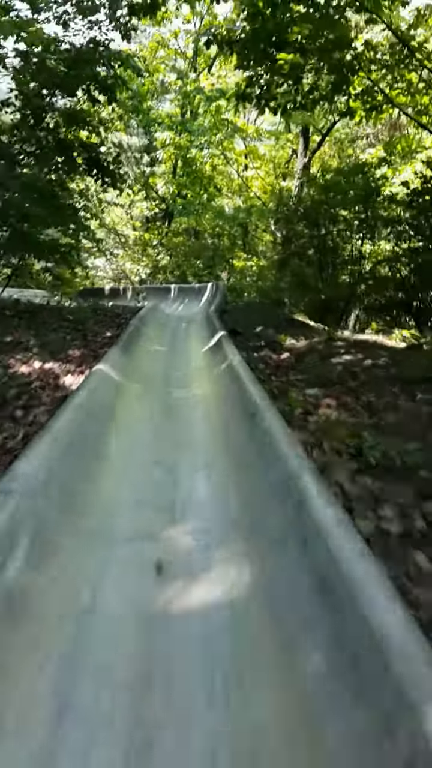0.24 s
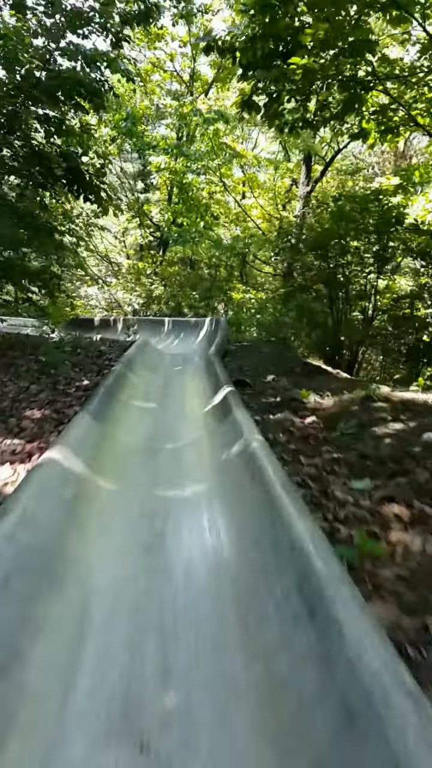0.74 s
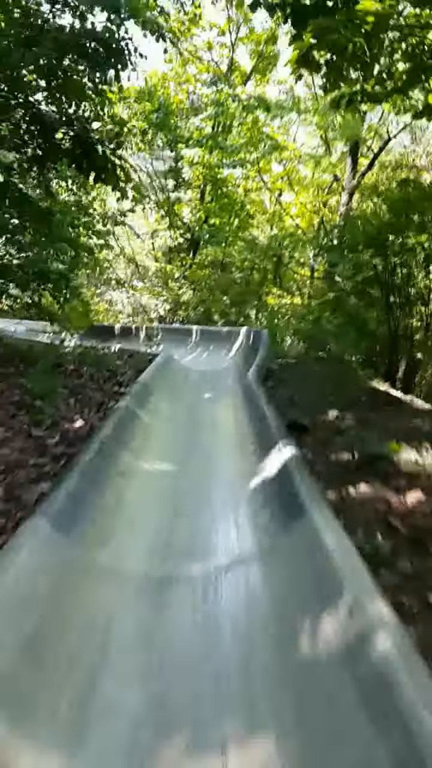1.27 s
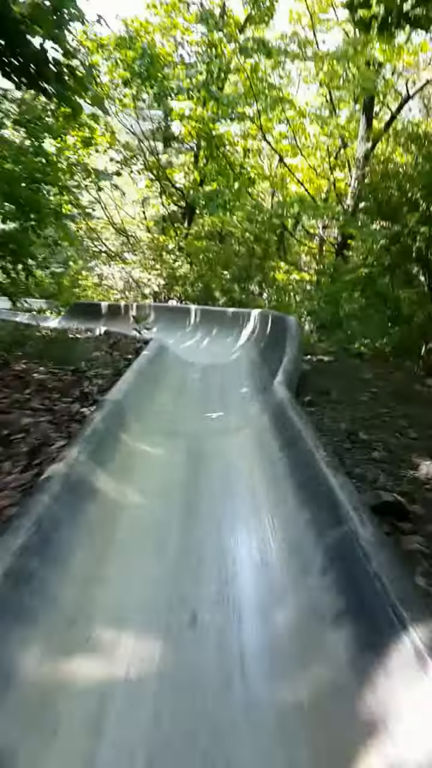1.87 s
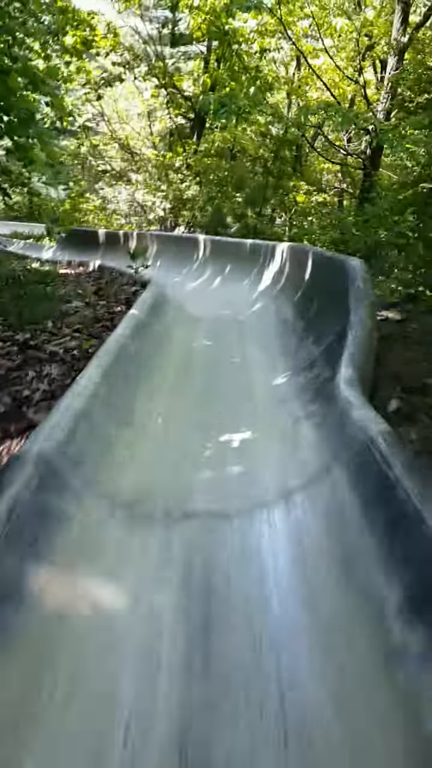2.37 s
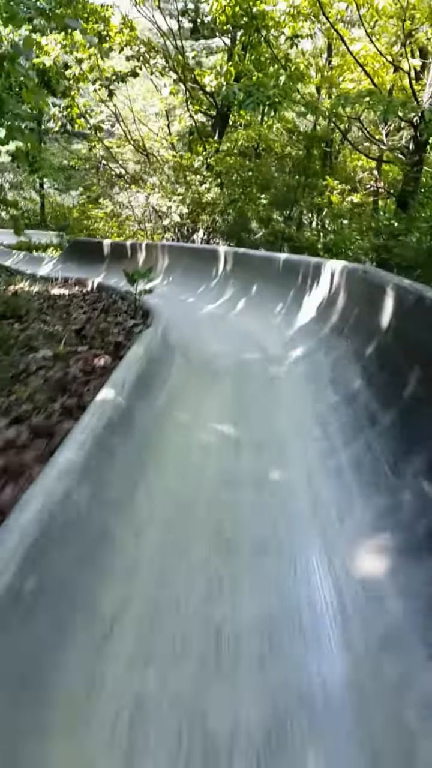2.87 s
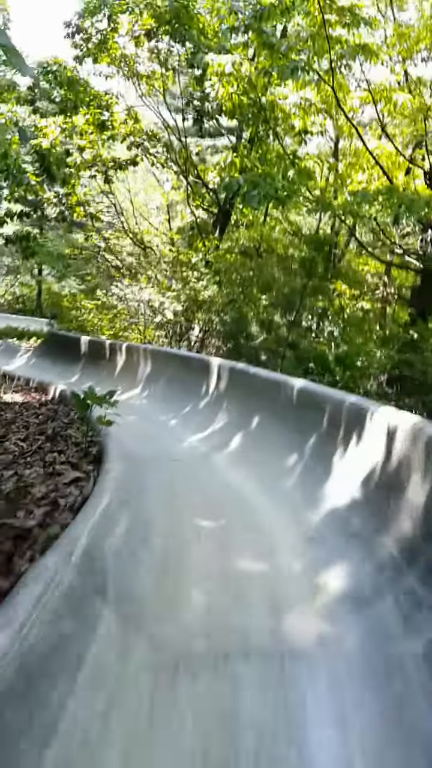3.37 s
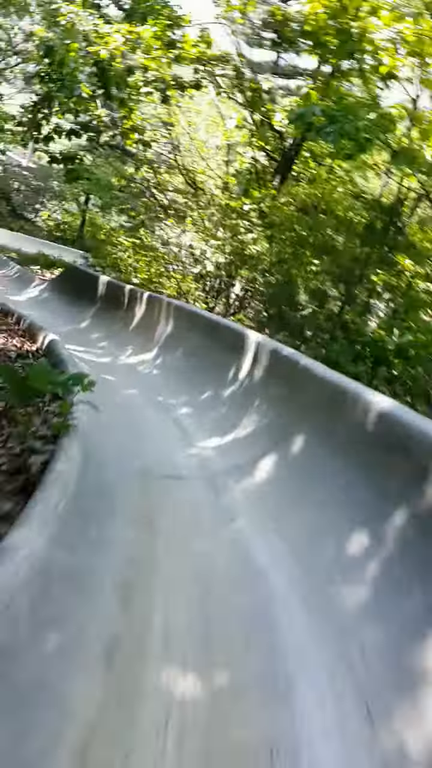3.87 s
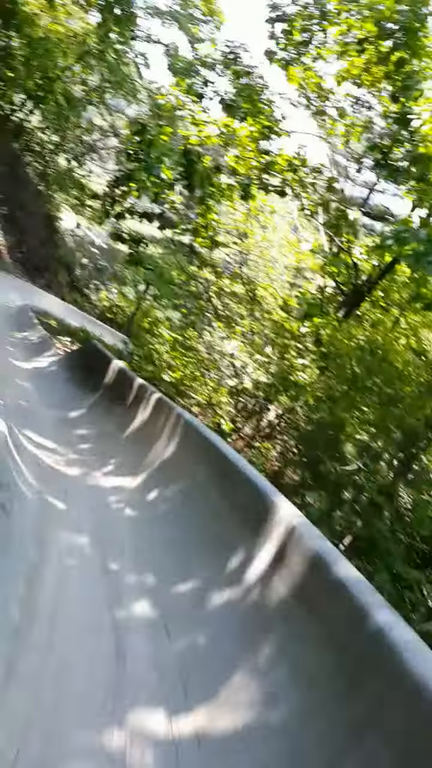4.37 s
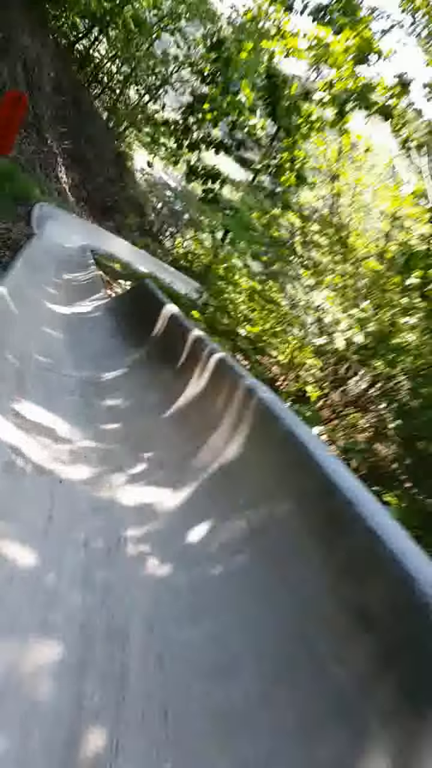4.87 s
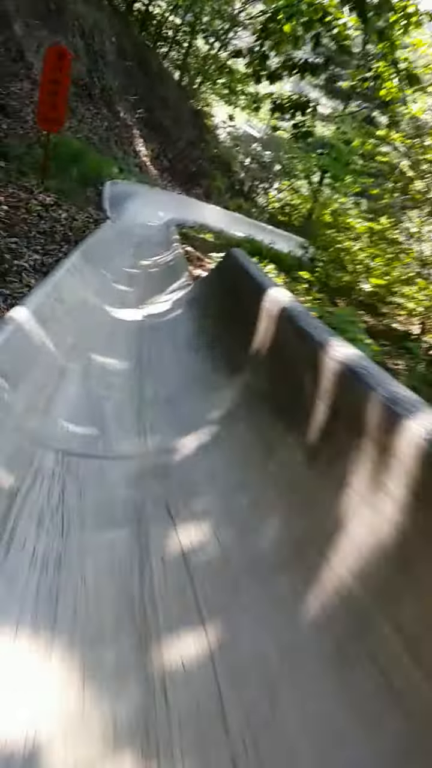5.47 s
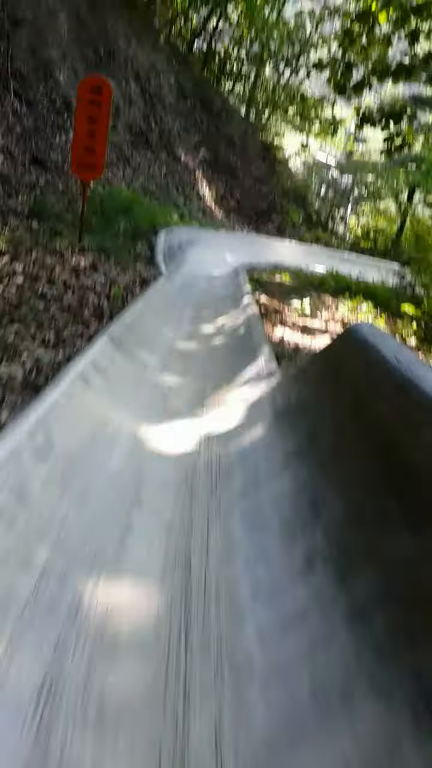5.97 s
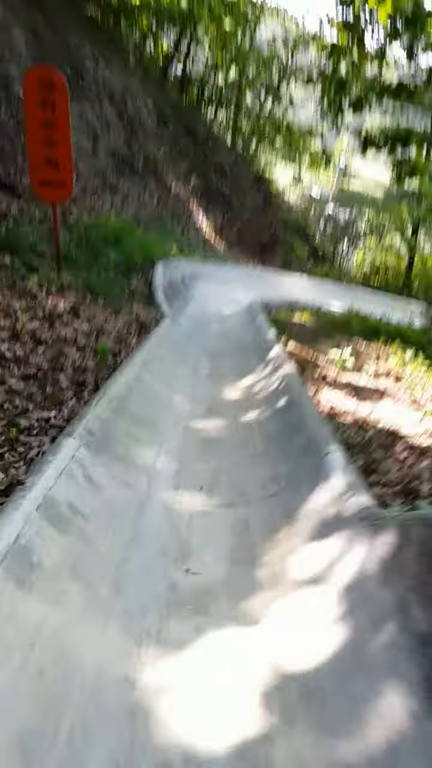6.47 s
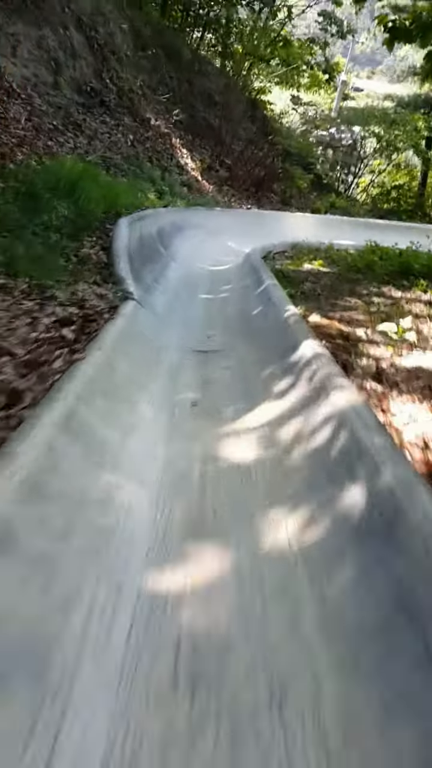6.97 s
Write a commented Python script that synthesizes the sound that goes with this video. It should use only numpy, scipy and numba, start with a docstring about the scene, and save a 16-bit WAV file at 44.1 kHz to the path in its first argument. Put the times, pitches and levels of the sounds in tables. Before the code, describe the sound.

A wheeled sled rumbles fast down a sheet-steel trough, deep lumpy boom and metallic roar, with gritty hiss and sharp clattering knocks over seams.

```python
"""A wheeled sled rolls down a sheet-steel trough: its worn tread repeats its bumps each wheel turn
and booms in the sled's body. The same bumps, with grains and noise, excite trough roar and plate hum;
sandy noise makes the hiss of grit and runner. Axles knock over the seams, loose parts rattle, a pebble snaps.
Bumps, sand and blows pass through resonances. The left port on board hears rolling and knocks first."""
import sys
import numpy as np
from scipy import signal
from scipy.fft import rfft, irfft, next_fast_len
from scipy.io import wavfile
from scipy.ndimage import uniform_filter1d
from numba import njit

SR = 44100
rng = np.random.default_rng(int(sys.argv[2]) if len(sys.argv) > 2 else 0)


def ratio_of_db(decibels):
    """Turn decibels (scalar or array-like) into linear amplitude factors; 0 dB maps to 1."""
    return 10 ** (np.asarray(decibels, float) / 20)


def materialize(psi):
    """Save the field psi as 16-bit PCM at rate SR to the path in sys.argv[1].

    A 1-D psi becomes a single channel; in a 2-D psi each row is a channel.
    """
    bounded = np.clip(np.atleast_2d(psi).T, -1, 1)
    quanta = np.round(bounded * 32767).astype(np.int16)
    wavfile.write(sys.argv[1], SR, quanta)


N = 318843
TIME = np.arange(N) / SR
SIZE = next_fast_len(N + SR)
HZ = np.arange(SIZE // 2 + 1) * SR / SIZE + 1e-3  # offset avoids 0 / 0 and log 0


def curve(table, at):
    """Columns of a table, joined by straight lines."""
    first, *columns = np.transpose(table)
    return [np.interp(at, first, column) for column in columns]


def unit(x):
    """Scale to rms 1."""
    return x / np.sqrt(np.mean(x ** 2))


def steady(x):
    """Even out the slow level to about rms 1, so that only quick throbs remain."""
    span = int(.3 * SR)
    power = uniform_filter1d(uniform_filter1d(x ** 2, span), span)
    return x / np.sqrt(power)


def walk(rate_hz):
    """Random levels, each held 1 / rate_hz and slewed twice; rms 1."""
    hold = int(SR / rate_hz)
    levels = np.repeat(rng.standard_normal(N // hold + 1), hold)
    return unit(uniform_filter1d(uniform_filter1d(levels, hold), hold)[:N])


def grains(rate_hz, spread_db):
    """Scattered tiny impacts of either sign, a few of them much larger."""
    hit, sign, size = rng.random((3, N))
    return unit((hit < rate_hz / SR) * np.sign(sign - .5) * ratio_of_db(-spread_db * np.log(1 - size)))


def ring(x, modes, order=1, struck=False):
    """Parallel resonances; order steepens skirts (width_hz is at order 1); struck ones ring after the blow."""
    shapes = []
    for pitch_hz, width_hz, level_db in modes:
        damping = 1j * HZ * width_hz
        shapes.append(ratio_of_db(level_db) * (damping / (pitch_hz ** 2 - HZ ** 2 + damping)) ** order)
    shape = sum(shapes) if struck else sum(map(np.abs, shapes))
    return irfft(rfft(x, SIZE) * shape, SIZE)[:N]


def struck(force, modes):
    """Ringing after blows; a single blow of size 1 peaks at 1."""
    peak = np.abs(ring(TIME == 0, modes, order=2, struck=True)).max()
    return ring(force, modes, order=2, struck=True) / peak


def flickering(force, modes, rate_hz, depth_db):
    """Every resonance flickers on its own as the contact wanders."""
    return steady(sum(ratio_of_db(depth_db * walk(rate_hz)) * ring(force, [mode], order=2) for mode in modes))


def touches(table):
    """Gain of passing touches: each swells linearly, holds and dies away."""
    attack_s, release_s = .045, .055
    gain = 0
    for start_s, length_s, level_db in table:
        swell = np.clip((TIME - start_s) / attack_s, 0, 1)
        fade = np.exp(-np.clip(TIME - start_s - length_s, 0, None) / release_s)
        gain = gain + ratio_of_db(level_db) * swell * fade
    return gain


# flights over seams: landing_s, drop_db, air_s, landing_boom_db
SEAMS = [(0.561, -6.5, 0.046, -18.5), (1.6, -7.5, 0.1, -42), (2.31, -1, 0.058, -11.5),
         (2.472, -7.5, 0.1, -4.5), (3.558, -9, 0.11, -15), (4.571, -13, .16, -16),
         (5.342, -15.5, 0.039, -18), (6.282, -7.5, 0.074, -14), (6.677, -14.5, 0.05, -1.5)]


def lift_db():
    """Load eases off over the first half of each flight; it is back within 2.6 ms, by the landing."""
    landing_s = 0.0026
    lift = 0
    for land_s, drop_db, air_s, _ in SEAMS:
        easing = 2 * (TIME - land_s + air_s) / air_s
        returning = (land_s - TIME) / landing_s
        lift = lift + drop_db * np.clip(np.minimum(easing, returning), 0, 1)
    return lift


# contact with the trough: time_s, roar_db, plate_db, grit_db
CONTACT = [(0, -28, -37.5, -37), (.3, -29, -37, -41.5), (.75, -28.5, -37.5, -42.5), (1, -22.5, -36, -39),
           (1.3, -32, -36.5, -39.5), (1.55, -25, -32.5, -35.5), (1.95, -26.5, -43, -40),
           (2.35, -29, -35.5, -36), (2.65, -23.5, -39.5, -39), (3.1, -27.5, -42.5, -38),
           (3.55, -22, -33.5, -36.5), (3.95, -22.5, -31, -33), (4.35, -23, -37.5, -35.5),
           (4.7, -21.5, -30, -29.5), (5.2, -23.5, -32, -34), (5.45, -23, -34, -31.5),
           (5.8, -23, -37, -36.5), (6.2, -19.5, -31.5, -30.5), (6.75, -20.5, -37.5, -32),
           (7.23, -28.5, -33, -30.5)]


def contact_db():
    """Contact levels of roar, plate and grit; the roar takes about half of the lift over a seam."""
    roar_db, plate_db, grit_db = curve(CONTACT, TIME)
    return roar_db + 0.51 * lift_db(), plate_db, grit_db


# shell resonances: pitch_hz, width_hz, level_db
SHELL = [(3900, 1300, 0), (2300, 700, -9), (3200, 220, -13)]


def pebble():
    """One pebble snaps against the shell: a single blow rings its resonances."""
    start_s, blow_db = 6.8096, -7
    return struck(ratio_of_db(blow_db) * (np.arange(N) == int(start_s * SR)), SHELL)


# singing spells: start_s, length_s, level_db
SINGING = [(3.8, 0.33, -42.5), (4.7, 0.062, -39.5), (6.98, 0.056, -37.5)]
# singing floor plate: pitch_hz, width_hz, level_db
SINGING_PLATE = [(1070, 150, 0)]


def singing(bumps):
    """The floor plate sings at one flickering resonance while the load presses on it."""
    return flickering(bumps, SINGING_PLATE, 30, 2.5) * touches(SINGING)


# runner touches: start_s, length_s, level_db
SCRAPES = [(.92, 0.025, -44), (1.46, 0.082, -40.5), (2.47, 0.067, -44.5), (3.38, 0.11, -39.5),
           (4.314, 0.33, -34.5), (4.67, 0.11, -32.5), (4.884, 0.086, -37.5), (5.3, 0.043, -42.5),
           (5.76, 0.074, -35), (7.08, 0.078, -56)]
# banked wall resonances: pitch_hz, width_hz, level_db
WALL = [(3900, 3800, -0.17), (5900, 3900, -1.8)]


def scrape(sand):
    """A runner brushes the banked wall: sandy noise through the wall's resonances."""
    return flickering(sand, WALL, 20, 1.1) * touches(SCRAPES)


def loose_parts(loose):
    """Loose parts rattle: scattered impacts ring plate, trough and grit resonances."""
    roar_db, plate_db, grit_db = contact_db()
    on_plate = 0.76 * unit(struck(loose, PLATE)) * ratio_of_db(plate_db)
    on_trough = 0.58 * unit(struck(loose, TROUGH)) * ratio_of_db(roar_db)
    on_grit = 0.22 * unit(struck(loose, GRIT)) * ratio_of_db(grit_db)
    return on_plate + on_trough + on_grit


# blows at the seams: start_s, crack_db, clack_db, knock_db, thud_db, decay_t60_s
KNOCKS = [(.1085, -38, -24, -15, -19, .06), (.4598, -14, -14, -12, -13, .05),
          (.475, -28, -32, -22, -24, .08), (.51, -32, -30, -26, -20, .1), (.53, -25, -28, -24, -12, .08),
          (.6185, -40, -28, -14, -8, .07), (1.4700, -21, -23, -15, -11, .07),
          (1.4965, -18, -21, -19, -10, .1), (1.527, -22, -26, -22, -18, .12),
          (2.4736, -25, -28, -25, -14, .15), (2.5715, -29, -15, -10, -6, .05),
          (2.9702, -40, -26, -21, -19, .05), (3.588, -30, -34, -26, -22, .2),
          (3.8325, -31, -18, -16, -12, .07), (4.5390, -23, -27, -23, -26, .04),
          (4.5712, -20, -13, -9, -3, .08), (4.585, -19, -17, -14, -16, .08),
          (5.103, -30, -23, -12, -12, .06), (5.3245, -14, -19, -17, -10, .1),
          (5.341, -12, -23, -17, -6, .12), (5.4565, -21, -19, -9, -10, .1), (5.474, -11, -14, -18, -7, .04),
          (6.132, -36, -23, -26, -22, .05), (6.1795, -23, -18, -9, -3, .08),
          (6.1925, -27, -17, -17, -12, .1), (6.267, -18, -16, -12, -12, .05),
          (7.019, -36, -25, -20, -17, .07)]
# rattle against the blow: shares in crack, clack, knock, thud [ratio]
RATTLE_SHARES = (.12, .06, .03, .014)
# rim resonances: pitch_hz, width_hz, level_db
RIM = [(2400, 700, -3), (3300, 700, 0), (4300, 900, -4), (5300, 1100, -8), (6700, 1400, -11)]
# bracket resonances: pitch_hz, width_hz, level_db
BRACKET = [(1080, 260, -3), (1380, 320, 0), (1900, 500, -3)]
# axle resonances: pitch_hz, width_hz, level_db
AXLE = [(640, 170, 0), (860, 200, -2)]


def knocks(gaps_s):
    """A blow, three weaker bounces and a rattle: bright rim and bracket; dull axle, trough and body."""
    hold_s, bounce_db, body_db = .003, -3, -10  # bounce against the one before; thud into body
    after_s = np.arange(int(.2 * SR)) / SR
    noise = rng.standard_normal((len(KNOCKS), len(after_s)))
    force = np.zeros((5, N + len(after_s)))
    for (start_s, *levels_db, t60_s), rattle, gap_s in zip(KNOCKS, noise, gaps_s):
        start = int(start_s * SR)
        blows = np.outer(RATTLE_SHARES, rattle)
        bounces = (np.cumsum([0, *gap_s]) * SR).astype(int)
        blows[:, bounces] += ratio_of_db(bounce_db * np.arange(4))
        fading_s = np.clip(after_s - min(hold_s, t60_s / 5), 0, None)
        fading = np.exp(-np.log(1000) * fading_s / max(t60_s, .005))
        force[:4, start:start + len(after_s)] += ratio_of_db(np.array(levels_db))[:, None] * blows * fading
    for land_s, _, _, boom_db in SEAMS:
        force[4, int(land_s * SR)] = ratio_of_db(boom_db)
    crack, clack, knock, thud, landing = force[:, :N]
    bright = struck(crack, RIM) + struck(clack, BRACKET)
    body = struck(landing + ratio_of_db(body_db) * thud, BODY)
    dull = struck(knock, AXLE) + struck(thud, TROUGH) + body
    return bright, dull


def sandy_force():
    """Many small grains over a noise floor."""
    return 0.36 * grains(2900, 3.2) + 1.1 * rng.standard_normal(N)


# grit resonances: pitch_hz, width_hz, level_db
GRIT = [(1760, 1000, 5.5), (2130, 2200, -10.5), (3306, 1520, 4.5), (4720, 1700, 1.5), (7200, 1200, -0.5)]


def grit_hiss(sand, shudder_db, rasp_db):
    """Grit hisses in flickering treble bands, in uneven patches."""
    _, _, grit_db = contact_db()
    return flickering(sand, GRIT, 13, 0.85) * ratio_of_db(grit_db + 0.73 * shudder_db + rasp_db)


# plate resonances: pitch_hz, width_hz, level_db
PLATE = [(680, 130, 4), (879, 210, 1.5), (1140, 810, -14)]


def plate_hum(bumps, shudder_db):
    """The plate hums at its own resonances under the bumps."""
    _, plate_db, _ = contact_db()
    return flickering(bumps, PLATE, 32, 2.3) * ratio_of_db(plate_db + shudder_db)


# trough resonances: pitch_hz, width_hz, level_db
TROUGH = [(245, 52, -5), (315.5, 236, -3.5), (421, 157, -5.5)]


def trough_roar(bumps, shudder_db):
    """The sheet steel roars at its wide resonances under the bumps."""
    roar_db, _, _ = contact_db()
    return flickering(bumps, TROUGH, 21, 1.0) * ratio_of_db(roar_db + shudder_db)


@njit
def turns(fresh, period, memory):
    """Each turn brings back part of the last turn's bumps and adds new ones."""
    y = fresh.copy()
    for i in range(len(y)):
        k = i - int(period[i])
        if k >= 0:
            y[i] = memory[i] * y[k] + np.sqrt(1 - memory[i] ** 2) * fresh[i]
    return y


# wheel speed: time_s, turns_per_s
WHEEL = [(0, 10.8), (1.5, 11), (3.5, 11), (4.5, 11.3), (5.8, 11.3), (7.23, 11)]


def tread():
    """Force of the tread on the steel; a seam shifts the wheel's line and renews the pattern."""
    jolt = sum(np.exp(-((TIME - land_s) / 0.042) ** 2) for land_s, *_ in SEAMS)
    memory = .86 / (1 + 2.7 * jolt)
    return turns(rng.standard_normal(N), SR / curve(WHEEL, TIME)[0], memory)


# weight on the wheels: time_s, boom_db, seat_db, footwell_db
BOOM = [(0, -15.5, -28.5, -21), (.6, -12, -22, -27.5), (1, -13.5, -22, -19), (1.5, -12, -32.5, -28),
        (1.9, -18.5, -24, -14.5), (2.3, -16, -25.5, -40.5), (2.7, -16, -22.5, -21), (3.4, -15, -18, -23.5),
        (3.75, -14, -35.5, -29), (4.15, -12.5, -24.5, -18.5), (4.7, -22, -35, -18), (5, -10.5, -34.5, -18),
        (5.25, -14.5, -29.5, -16.5), (5.6, -11, -40.5, -20), (5.9, -15, -35, -24), (6.2, -13.5, -16, -15),
        (6.55, -21.5, -36.5, -21.5), (6.85, -16.5, -16, -24.5), (7.23, -17.5, -36, -24)]
# body resonances: pitch_hz, width_hz, level_db
BODY = [(93, 25, -9.5), (124.1, 46.7, 1.5)]
# seat resonance: pitch_hz, width_hz, level_db
SEAT = [(71.5, 42, 0)]
# footwell resonance: pitch_hz, width_hz, level_db
FOOTWELL = [(161.4, 33.3, 0)]


def body_boom(force, throb_db):
    """The tread booms in body, seat and footwell; lift over seams eases the seat least."""
    seat_share = 0.17
    lift = np.outer([1, seat_share, 1], lift_db())
    boom_db, seat_db, footwell_db = curve(BOOM, TIME) + lift + throb_db
    boom = steady(ring(force, BODY, order=3)) * ratio_of_db(boom_db)
    seat = steady(ring(force, SEAT, order=2)) * ratio_of_db(seat_db)
    footwell = steady(ring(force, FOOTWELL, order=2)) * ratio_of_db(footwell_db)
    return boom + seat + footwell


def ride(shudder_db, rasp_db, loose, throb_db):
    """All rolling sounds: one tread force drives boom, roar, plate and singing; sand drives the hisses."""
    force = tread()
    bumps = 0.6 * force + 0.44 * grains(900, 3.2) + 0.5 * rng.standard_normal(N)
    sand = sandy_force()
    background = singing(bumps) + scrape(sand) + loose_parts(loose)
    contact = grit_hiss(sand, shudder_db, rasp_db) + plate_hum(bumps, shudder_db)
    return background + contact + trough_roar(bumps, shudder_db) + body_boom(force, throb_db)


# right port against left: pitch_hz, likeness_0_to_1
LIKENESS = [(30, .9), (50, .93), (75, .99), (200, .985), (300, .92), (500, .84), (1000, .42), (2000, .35),
            (6000, .25)]
# right port against left: pitch_hz, lag_rad
BEHIND = [(0, 0), (260, .9), (600, 2.7), (950, 4.0), (1290, 6.7), (1720, 8.6), (2410, 12.6), (8000, 12.6)]
# right port against left: pitch_hz, loss_db
QUIETER = [(60, 2.2), (300, 3.2), (490, 3.8), (820, 2.5), (1390, -.5), (2350, -.5), (3970, 2), (6710, 5.5)]


def right_port(left, other, bright, other_bright, dull):
    """The sound arrives later, mostly softer, and in the treble as a different mix."""
    like = np.interp(np.log(HZ), np.log(np.array(LIKENESS)[:, 0]), np.array(LIKENESS)[:, 1])
    lag_rad = curve(BEHIND, HZ)[0]
    rolling = like * rfft(left, SIZE) + np.sqrt(1 - like ** 2) * rfft(other, SIZE) + rfft(dull, SIZE)
    knocking = like * rfft(bright, SIZE) + (1 - like) * rfft(other_bright, SIZE)
    # bright cracks reach both ports sooner together
    arriving = np.exp(-1j * lag_rad) * rolling + np.exp(-1j * .3 * lag_rad) * knocking
    return irfft(ratio_of_db(-curve(QUIETER, HZ)[0]) * arriving, SIZE)[:N]


def scene():
    """Ride and knocks at two ports; the pebble is equally near both."""
    shudder_db, rasp_db = 1.48 * walk(16), 1.1 * walk(24)
    throb_db = 1.5 * walk(26)  # the wheels skip, so the whole bass comes in lumps
    loose = grains(60, .7)
    left = ride(shudder_db, rasp_db, loose, throb_db)
    other = ride(shudder_db, rasp_db, loose, throb_db)
    gaps_s = rng.uniform(.004, .008, (len(KNOCKS), 3))
    bright, dull = knocks(gaps_s)
    other_bright, _ = knocks(gaps_s)
    right = right_port(left, other, bright, other_bright, dull)
    return np.array([left + bright + dull, right]) + pebble()


def top_cut(x):
    """Nothing passes above the cut-off."""
    return signal.sosfilt(signal.butter(12, 7310, fs=SR, output="sos"), x)


def record(dry):
    """The microphone loses the lowest bass and the top; the loudest peaks are rounded."""
    bass_hz, top_hz, ceiling = 51.3, 5390, 1.2
    band = signal.butter(3, [bass_hz, top_hz], "bandpass", fs=SR, output="sos")
    heard = signal.sosfilt(band, dry)
    rounded = ceiling * np.tanh(heard / ceiling)
    return top_cut(rounded)


dry = scene()
out = record(dry)
materialize(out)
```